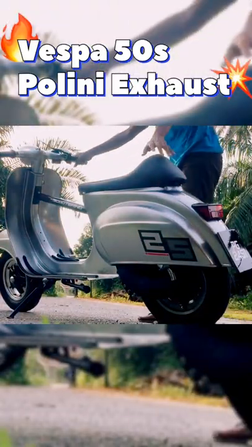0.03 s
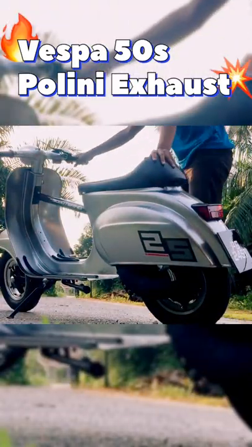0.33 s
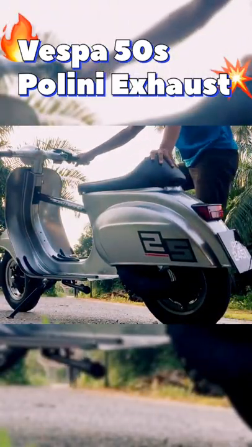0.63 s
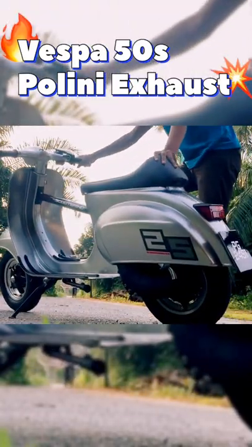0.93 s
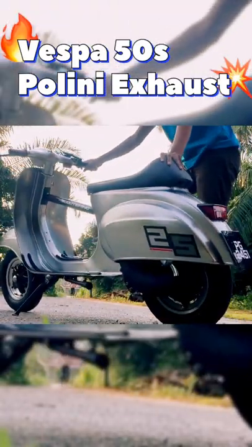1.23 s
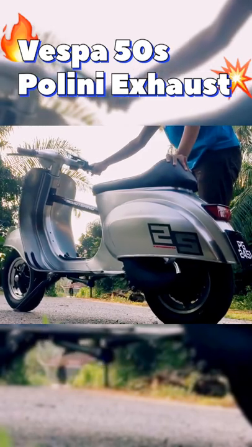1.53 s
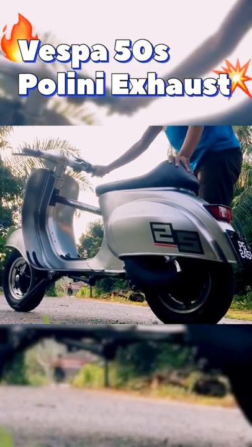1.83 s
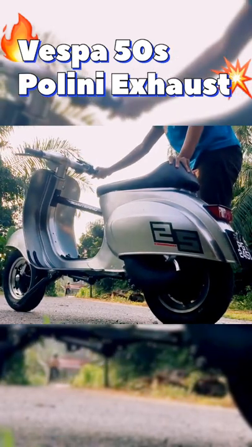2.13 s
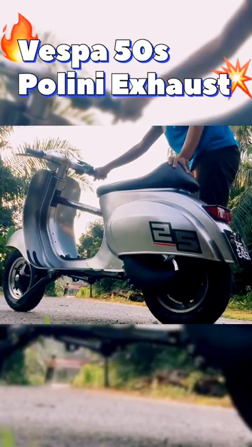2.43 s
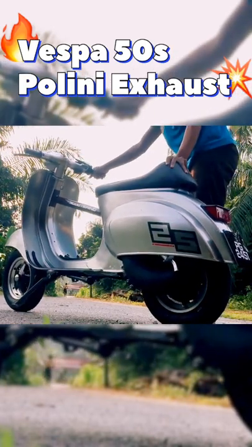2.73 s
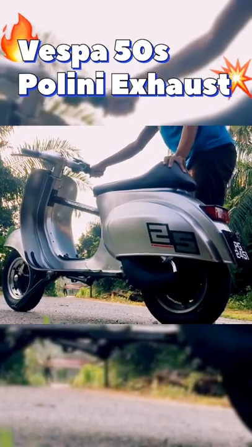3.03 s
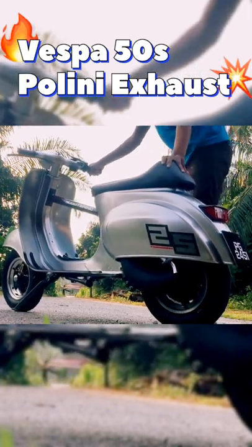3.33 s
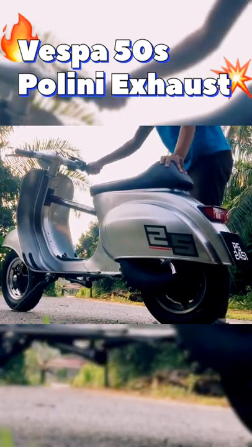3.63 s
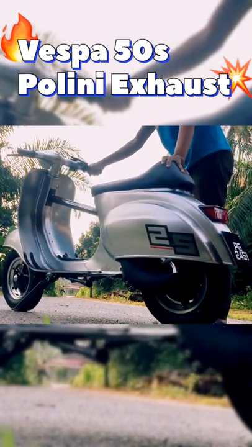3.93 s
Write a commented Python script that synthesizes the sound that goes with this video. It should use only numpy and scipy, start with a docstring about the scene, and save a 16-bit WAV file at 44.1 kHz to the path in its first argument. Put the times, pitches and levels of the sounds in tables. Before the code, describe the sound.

A scooter is pushed off its stand close by, engine off. Soft rustling and crackling grit lead to a shuddering thud and spring jangle at about 0.9 seconds. Loose metal parts knock as it rolls, with hard clacks at 2.1 and 2.3 seconds and a few light ticks. A shoe scuffs at 3.5 seconds. Faint insects, a distant idling engine and low traffic rumble continue throughout.

```python
"""A steel-bodied scooter is pushed off its stand and rolled along a paved road, engine off.
First hands rustle on the seat and grit crackles under the stand. At 0.9 s the stand swings up, thuds
into its rubber stop and shudders, its spring jangling. Loose steel parts knock and the wheel ticks as it
rolls; one part clacks hard at 2.1 s, a thin squeak follows, and near 3.5 s a sole scuffs the road, then
comes a faint shuffle. All the while insects buzz in the trees and a far engine idles."""
import sys
import numpy as np
from scipy import signal
from scipy.fft import rfft, irfft, next_fast_len
from scipy.io import wavfile
from scipy.ndimage import map_coordinates

SR = 44100
rng = np.random.default_rng(int(sys.argv[2]) if len(sys.argv) > 2 else 0)


def persist_wave(psi):
    """Save psi, clipped to +-1, as 16-bit WAV."""
    counts = np.round(np.clip(psi, -1, 1) * 32767).astype(np.int16)
    wavfile.write(sys.argv[1], SR, np.atleast_2d(counts).T)


N = 176400
TIME = np.arange(N) / SR
T = np.arange(SR // 3) / SR  # seconds within one hit


# knocks of loose steel parts, and one faint dull shuffle near 3.8 s
# (t/s, hollow body level/dB, clang level/dB, crack level/dB)
KNOCKS_AND_SHUFFLE = [(.068, -40.5, -49.5, -57), (0.734, -37.5, -45, -43), (0.742, -41, -60, -54),
                      (0.7876, -35, -37.5, -50), (.799, -30.5, -41.5, -51), (1.493, -48, -49, -50.5),
                      (1.504, -37.5, -40.5, -64), (1.518, -33.5, -41, -69), (1.56, -51, -53, -75),
                      (1.653, -45, -56, -67), (1.712, -39.5, -44, -46), (1.769, -35, -47.5, -52),
                      (1.781, -36.5, -45, -58), (2.018, -64, -49, -57.5), (2.033, -41.5, -43.5, -89),
                      (2.050, -34.5, -42.5, -65), (2.313, -40, -41, -42.5), (2.3216, -27, -29, -46),
                      (0.668, -40.5, -54.5, -80), (3.502, -37, -47, -42.5), (3.324, -62, -56.5, -56.5),
                      (3.783, -54, -71, -80), (.280, -52, -50.5, -68), (.308, -45, -53, -70)]
# ring of the body shell and of the steel parts (f/Hz, width/Hz, level/dB)
SHELL_MODES = [(242, 64, -11), (403, 56, -13), (561, 27, 0.5), (654, 23, 0.5), (764, 45, -8.5),
               (901, 55, -4), (1082, 35.5, -4)]
STEEL_MODES = [(1330, 290, -8), (1566, 146, -3.5), (1800, 206, 1), (2040, 234, 0.5), (2870, 540, -6),
               (3540, 160, -8), (3810, 180, -5.5), (4540, 770, -11)]
# EQ of the crack (f/Hz, level/dB)
CRACK_EQ = [(800, -50), (3000, 10), (4700, 0.5), (5100, 1.5), (6400, 1.5), (8000, -7), (9500, -8),
            (11000, -20), (16000, -13)]

def knocks(shell_lag_s=0.00039, rattle_db=3, octaves_per_db=0.4):
    """Steel parts crack and clang, and the body shell answers; the latest cue is only a dull shuffle."""
    out = np.zeros(N)
    for s, body_db, clang_db, crack_db in KNOCKS_AND_SHUFFLE:
        cut_hz = 6200 * 2 ** (octaves_per_db * (crack_db + 58.5))  # harder cracks are brighter
        crack_eq = lambda f: colour(CRACK_EQ)(f) / (1 + (f / cut_hz) ** 10)
        body = contact(struck(SHELL_MODES, cut_hz=1800), 0.00051, 0.0077, rattle_db)
        clang = contact(struck(STEEL_MODES, cut_hz=2030), 0.00082, 0.011, rattle_db)
        crack = contact(crack_eq, 0.00023, 0.014, rattle_db)
        add(out, s + shell_lag_s, body_db, body)
        add(out, s, clang_db, clang)
        add(out, s, crack_db, crack)
    return out


# the hard clack and its rebound; the panel's jolt and flap back (t/s, level/dB)
CLACK_HITS = [(2.1433, -27.5), (2.149, -29)]
PANEL_HITS = [(2.146, -31), (2.176, -36)]
# EQ of the clack (f/Hz, level/dB)
CLACK_EQ = [(100, -16), (300, -2), (760, 0), (1240, -15), (1500, -8), (3550, -8), (4490, -3.5),
            (5150, -14.5), (6510, -13), (9080, -18), (14800, -28.5)]
# bright ring of the part, hollow ring of the panel (f/Hz, width/Hz, level/dB)
CLACK_MODES = [(2730, 390, -1), (4560, 320, -9)]
PANEL_MODES = [(376, 60, -7), (492, 53, -9.5), (643.5, 14.6, 4), (868, 24, -5.5), (1097, 45, -2)]

def clack(ring_db=-7):
    """One part snaps home, rebounds and jolts the panel behind it."""
    out = np.zeros(N)
    for s, db in CLACK_HITS:
        add(out, s, db, contact(colour(CLACK_EQ), rise_s=0.00054, fall_s=0.0092))
        add(out, s, db + ring_db, contact(resonances(CLACK_MODES), rise_s=0.0012, fall_s=0.0024))
    for s, db in PANEL_HITS:
        add(out, s, db, contact(struck(PANEL_MODES, cut_hz=940), rise_s=0.00077, fall_s=0.0027))
    return out


# thud tones, sagging as the rubber relaxes (starting f/Hz, sag/(octaves/s), level/dB, attack t/s)
THUD_TONES = [(527, 36.3, -22.5, 0.013), (903, 15, -27.5, .0095), (269.6, 23, -26.5, 0.016)]
# bounces against the stop and shakes of the spring (t/s, level/dB)
SHUDDER_HITS = [(0.8895, -26), (.906, -28.5), (.930, -33), (.953, -32.5), (0.975, -31.5), (.990, -35),
                (1.011, -32), (1.033, -38.5), (1.067, -42), (1.111, -39), (1.150, -39.5), (1.172, -44)]
JANGLE_HITS = [(.893, -49.5), (0.928, -45.5), (.953, -46), (.977, -47.5), (1.032, -52)]
# ring of the stand, the frame and the spring (f/Hz, width/Hz, level/dB)
STAND_MODES = [(420, 34, -3), (526, 19, -2.5), (621, 18, 3), (740, 56, -4), (878, 33, -0.5),
               (1720, 2100, -28)]
FRAME_MODES = [(184.5, 48, 7), (255, 45, 0.5), (315, 36, 3)]
SPRING_MODES = [(1356, 25, 3.5), (1590, 130, -1), (1860, 17, 11), (2100, 86, -2), (2450, 65, 3.5),
                (3410, 460, -12.5), (4780, 320, -9), (5980, 310, -14), (9600, 430, -13), (11400, 450, -18)]

def stand(thud_s=0.8895, boom_db=-8):
    """The stand thuds into its rubber stop and shudders; the frame booms and the spring jangles."""
    out = np.zeros(N)
    for hz, sag, db, peak_s in THUD_TONES:
        swell = (T / peak_s) ** 2
        phase = 2 * np.pi * (np.cumsum(hz * 2 ** (-sag * T)) / SR + rng.random())
        add(out, thud_s, db, swell * np.exp(-swell) * np.sin(phase))
    for s, db in SHUDDER_HITS:
        thump = contact(struck(STAND_MODES, cut_hz=1500, detune=0.024), rise_s=0.00066, fall_s=0.0088)
        boom = contact(struck(FRAME_MODES, cut_hz=650), rise_s=0.00017, fall_s=0.0017)
        add(out, s, db, thump)
        add(out, s, db + boom_db, boom)
    for s, db in JANGLE_HITS:
        spring = struck(SPRING_MODES, cut_hz=9700, detune=0.0254)
        add(out, s, db, contact(spring, rise_s=0.00026, fall_s=0.013))
    return out


# snapping stones (t/s, click level/dB, leg ring level/dB)
GRIT_SNAPS = [(0.212, -59.5, -78), (.276, -56, -69), (0.327, -53, -62), (0.37, -55, -64),
              (0.3751, -53, -58), (.381, -55, -59), (0.406, -55, -62), (.412, -48, -48.5),
              (0.4192, -57, -55), (.447, -54, -58), (0.4616, -53, -53), (0.477, -46, -46),
              (0.479, -46.5, -56), (0.514, -65, -51), (0.5218, -53, -48), (0.528, -51, -51),
              (0.5431, -40.5, -32.5), (0.5478, -39.5, -40.5), (0.5529, -45, -42.5), (0.5617, -42.5, -44),
              (1.559, -58, -53)]
# EQ of the grit (f/Hz, level/dB)
GRIT_EQ = [(300, -2), (1100, 1.5), (1900, 6), (3000, -2), (5000, -3), (9500, -4), (10600, -10),
           (12500, -4.5), (16000, -2.5)]
# ring of the stand's legs (f/Hz, width/Hz, level/dB)
LEG_MODES = [(1510, 99, -5), (1870, 145, 2.5), (2720, 200, 7.5), (3400, 560, 1)]
# fader of the fine crunch (t/s, level/dB)
CRUNCH_FADER = [(.25, -64), (.30, -58.5), (.35, -66), (.41, -55.5), (.5, -55), (.56, -63), (.62, -62),
                (.72, -73), (.76, -100)]

def grit(spikiness=0.55, scatter_db=-7, density=0.04):
    """Stones snap under the stand's feet and ring its legs, over a crunch of finer grains."""
    out = np.zeros(N)
    stone = colour(GRIT_EQ)
    for s, click_db, ring_db in GRIT_SNAPS:
        add(out, s, click_db, contact(stone, rise_s=0.00005, fall_s=0.00033))
        add(out, s, click_db + scatter_db, contact(stone, rise_s=0.00024, fall_s=0.0091))
        legs = struck(LEG_MODES, cut_hz=2100, detune=0.037)
        add(out, s, ring_db, contact(legs, rise_s=0.00005, fall_s=0.00031))
    grains = rng.standard_normal(N) * np.exp(spikiness * rng.standard_normal(N))
    grains *= rng.random(N) < density
    return out + unit(filtered(grains, stone)) * amp(fader(CRUNCH_FADER))


# shoe strokes (t/s, length/s, sole level/dB, rasp level/dB)
SCUFF_STROKES = [(1.088, 0.077, -56, -51), (3.467, 0.017, -51.5, -72), (3.480, 0.027, -37, -47.5)]
# EQ of the sole (f/Hz, level/dB)
SOLE_EQ = [(240, -16), (400, -9), (765, -4.5), (1030, -17), (1160, -1.5), (1510, -22), (1760, -16),
           (2630, -5.5), (3870, -10), (8900, -18.5), (16000, -36)]
# raspy peaks on top (f/Hz, width/Hz, level/dB)
RASP_MODES = [(1900, 300, 4), (2340, 410, 2.5), (2780, 220, 3)]

def scuffs(grain=0.6):
    """A sole drags over the rough road."""
    out = np.zeros(N)
    for s, length, db, rasp_db in SCUFF_STROKES:
        rub = arch(T / length) * rng.standard_normal((2, len(T)))
        sole, rasp = rub * np.exp(grain * rng.standard_normal(len(T)))
        length_db = 10 * np.log10(length / 0.01)  # holds the level over the whole stroke
        add(out, s, db + length_db, filtered(sole, colour(SOLE_EQ)))
        add(out, s, rasp_db + length_db, filtered(rasp, struck(RASP_MODES, cut_hz=6900)))
    return out


# fader of the rustle (t/s, level/dB)
RUSTLE_FADER = [(0, -54.5), (.06, -50.5), (.25, -59), (.7, -54), (1.3, -63.5), (2, -88)]
# its soft, dull EQ (f/Hz, level/dB)
RUSTLE_EQ = [(120, -39), (280, 2), (400, 1), (520, 0), (720, -6), (1100, -16), (2200, -25), (5000, -54)]

def rustle(flutter_db=3.6):
    """Hands and clothes rub on the seat as the push begins."""
    return noise(RUSTLE_EQ) * amp(fader(RUSTLE_FADER) + flutter_db * wobble(37))


# wheel ticks (t/s, level/dB)
TICK_HITS = [(.591, -57), (0.613, -56), (0.633, -52.5), (0.643, -55.5), (2.404, -63.5), (2.425, -60),
             (3.012, -56.5), (3.1773, -54.5), (3.2308, -63.5)]
# their ring (f/Hz, width/Hz, level/dB)
TICK_MODES = [(2700, 410, 12), (3170, 116, 17.5), (3570, 140, 13)]

def ticks():
    """Small dry ticks as the wheel turns."""
    out = np.zeros(N)
    for s, db in TICK_HITS:
        add(out, s, db, contact(resonances(TICK_MODES), rise_s=0.00025, fall_s=0.00077))
    return out


# glide of the squeak (t/s, f/Hz, level/dB)
SQUEAK_GLIDE = [(2.55, 12000, -82), (2.615, 12100, -83), (2.645, 12680, -81), (2.72, 12250, -74)]

def squeak(waver_hz=70):
    """Rubbing metal gives a thin, unsteady whistle as the wheel rolls."""
    s, hz, db = np.transpose(SQUEAK_GLIDE)
    fade = arch((TIME - s[0]) / (s[-1] - s[0]))
    pitch = np.interp(TIME, s, hz) + waver_hz * wobble(580)
    return amp(np.interp(TIME, s, db)) * fade * unit(np.sin(2 * np.pi * np.cumsum(pitch) / SR))


# narrow, high EQ of the insect chorus (f/Hz, level/dB)
CHORUS_EQ = [(6000, -71.5), (6750, -14), (7050, 7), (7300, 9), (7600, 6.5), (8100, -6.5), (10000, -42.5)]

def insects(pitch_hz=7215, sweep_hz=507, pulse_hz=81.5, buzz_db=-69, chorus_db=-69, overtone_db=-14):
    """One insect pulses in groups of four, each pulse falling in pitch, over a steady chorus."""
    cycles = np.cumsum(pulse_hz * (1 + 0.018 * wobble(30))) / SR
    in_pulse = cycles % 1
    phase = 2 * np.pi * np.cumsum(pitch_hz + sweep_hz * (.5 - in_pulse) + 110 * wobble(900)) / SR
    groups = 1 + 0.86 * np.cos(np.pi * cycles / 2)
    pulses = unit(np.sin(np.pi * in_pulse) ** 2 * groups * amp(2 * wobble(55)))
    tone = unit(np.sin(phase) + amp(overtone_db) * np.sin(2 * phase))
    return amp(buzz_db) * pulses * tone + amp(chorus_db) * noise(CHORUS_EQ)


# engine hum (harmonic number, level/dB before the fader)
IDLE_HARMONICS = [(2, -52), (3, -58.5), (4, -48), (5, -52.5)]
# fader of the hum (t/s, level/dB)
IDLE_FADER = [(0, 2.5), (.7, 3), (1.4, -0.5), (1.9, 3.5), (2.4, -6.5), (3.1, 0.5), (4, -4.5)]
# EQ of the traffic and air beds (f/Hz, level/dB)
TRAFFIC_EQ = [(20, -47), (35, -12), (52, -14), (62, -4), (85, -2), (113, -4.5), (150, -4), (200, -6.5),
              (245, -15.5), (400, -22.5), (600, -25), (1200, -39), (2000, -88.5)]
AIR_EQ = [(300, -8.5), (1000, 0), (2000, -1.5), (4000, -5.5), (6500, -9.5), (9000, -9), (11000, -14),
          (13000, -12), (14500, -8.5), (15400, -6), (16000, -39)]

def far_engine_and_traffic(idle_hz=36.59, rumble_db=-44, air_db=-68):
    """A far engine idles unevenly over low traffic rumble and faint air."""
    turn = 2 * np.pi * np.cumsum(idle_hz * (1 + 0.00917 * wobble(2.987))) / SR
    hum = np.zeros(N)
    for k, db in IDLE_HARMONICS:
        hum += amp(db + 1.9 * wobble(6.04)) * unit(np.sin(k * turn + 0.28 * wobble(10)))
    traffic = amp(rumble_db + 2.32 * wobble(7.724)) * noise(TRAFFIC_EQ)
    return amp(fader(IDLE_FADER)) * hum + traffic + amp(air_db) * noise(AIR_EQ)


# outdoor reverb time (f/Hz, t/s to fall 60 dB)
REVERB_TIMES = [(200, 0.32), (1000, 0.41), (4000, 0.3), (14000, 0.18)]

def outdoors(x, build_s=0.013, drift_hz=45, paths=4):
    """Trees and walls return a thin tail; its paths mingle so that no pitch hangs on."""
    wet = np.zeros(N)
    for _ in range(paths):
        hz, t, bands = signal.stft(rng.standard_normal(SR // 2), SR, nperseg=256)
        decay = amp(-60 * t / along(REVERB_TIMES, hz)[:, None])
        tail = signal.istft(bands * decay * (1 - np.exp(-t / build_s)), SR, nperseg=256)[1]
        wet += wobble(drift_hz) * signal.fftconvolve(x, tail / np.linalg.norm(tail))[:N]
    return wet / np.sqrt(paths)


def contact(response, rise_s, fall_s, rattle_db=0, rattle_hz=580):
    """A noise burst through a response; rattle_db makes it chatter as loose parts touch and part."""
    chatter = amp(rattle_db * np.tanh(wobble(rattle_hz, size=len(T))))
    pressure = (1 - np.exp(-T / rise_s)) * np.exp(-T / fall_s) * chatter
    return filtered(rng.standard_normal(len(T)) * pressure, response)


def struck(modes, cut_hz, vary_db=1.5, detune=0.01):
    """Resonances struck at a new spot each time, dulled above cut_hz by a blunt contact."""
    varied = [(hz * np.exp(detune * rng.standard_normal()), width, db + vary_db * rng.standard_normal())
              for hz, width, db in modes]
    return lambda f: resonances(varied)(f) / (1 + np.sqrt(2) * 1j * f / cut_hz - (f / cut_hz) ** 2)


def resonances(modes):
    """A bank of (f/Hz, width/Hz, level/dB) resonators, alternating in polarity."""
    return lambda f: sum((-1) ** k * amp(db) * 1j * f * width / (hz * hz - f * f + 1j * f * width)
                         for k, (hz, width, db) in enumerate(modes))


def colour(points):
    """A minimum-phase EQ through (f/Hz, level/dB) points."""
    def response(hz):
        cepstrum = irfft(np.log(amp(along(points, hz))))
        cepstrum[1:len(cepstrum) // 2] *= 2
        cepstrum[len(cepstrum) // 2 + 1:] = 0
        return np.exp(rfft(cepstrum))
    return response


def filtered(x, response):
    """x times a complex response of frequency."""
    size = 2 * next_fast_len(len(x))
    return irfft(rfft(x, size) * response(np.fft.rfftfreq(size, 1 / SR)), size)[:len(x)]


def noise(points):
    """Coloured noise of rms 1."""
    return unit(filtered(rng.standard_normal(N), colour(points)))


def wobble(rate, size=N):
    """A smooth random curve, rate knots a second."""
    return map_coordinates(rng.standard_normal(int(size * rate / SR) + 4), [np.arange(size) * rate / SR])


def add(track, s, db, sound):
    """Lay a sound on the track; dB is its energy spread over 10 ms."""
    part = track[round(s * SR):][:len(sound)]
    part += (amp(db) * np.sqrt(SR / 100) * sound / np.linalg.norm(sound))[:len(part)]


def along(points, hz):
    """Read (f/Hz, value) points on a log axis."""
    f, values = np.transpose(points)
    return np.interp(np.log(hz + 1), np.log(f + 1), values)


def fader(points):
    """A level ride in dB through (t/s, level/dB) points."""
    return np.interp(TIME, *np.transpose(points))


def arch(progress):
    """A rounded fade in and out as progress runs from 0 to 1."""
    return np.sqrt(np.abs(np.sin(np.pi * np.clip(progress, 0, 1))))


def amp(db):
    return 10 ** (np.asarray(db) / 20)


def unit(x):
    return x / np.sqrt(np.mean(x ** 2) + 1e-20)


def scene(wet_db=-18):
    """The scooter up close with a touch of reverb, over the background beds, in mono."""
    near = knocks() + clack() + stand() + grit() + ticks() + scuffs() + squeak() + rustle()
    return (near + amp(wet_db) * outdoors(near) + insects() + far_engine_and_traffic())[None]


def record(dry, low_cut_hz=25, top_hz=15650):
    """Master EQ: roll off the deepest bass and cut the very top steeply."""
    def band(hz):
        return hz ** 2 / np.hypot(hz ** 2, low_cut_hz ** 2) / (1 + (hz / top_hz) ** 120)
    return filtered(dry[0], band)[None]


dry = scene()
out = record(dry)
persist_wave(out)
```